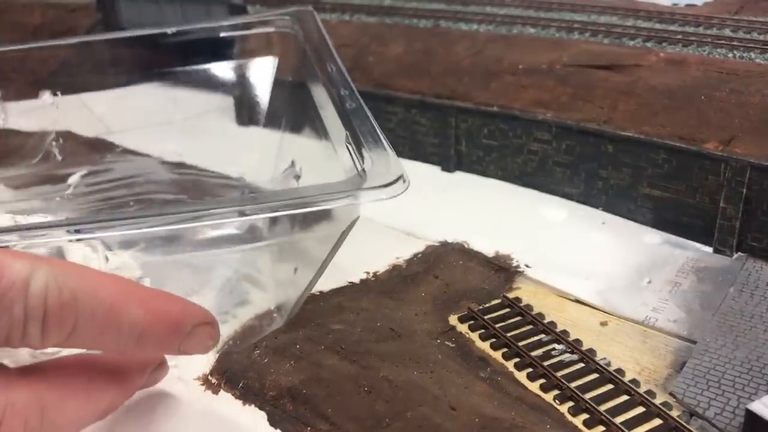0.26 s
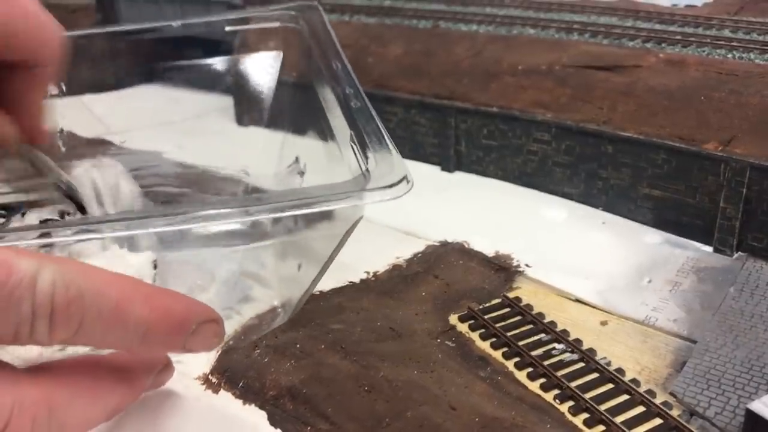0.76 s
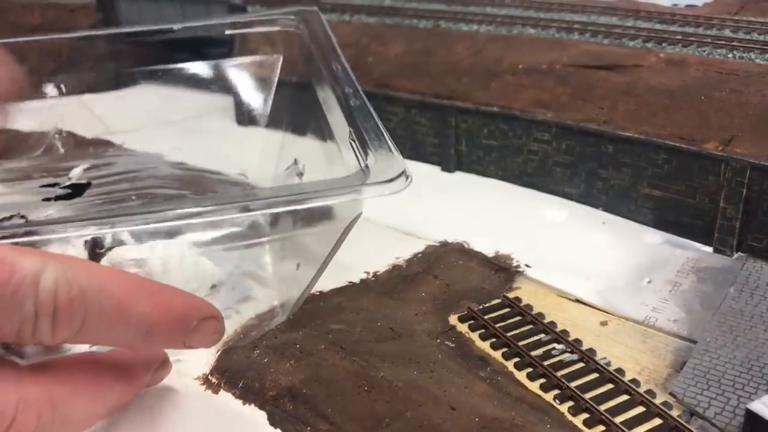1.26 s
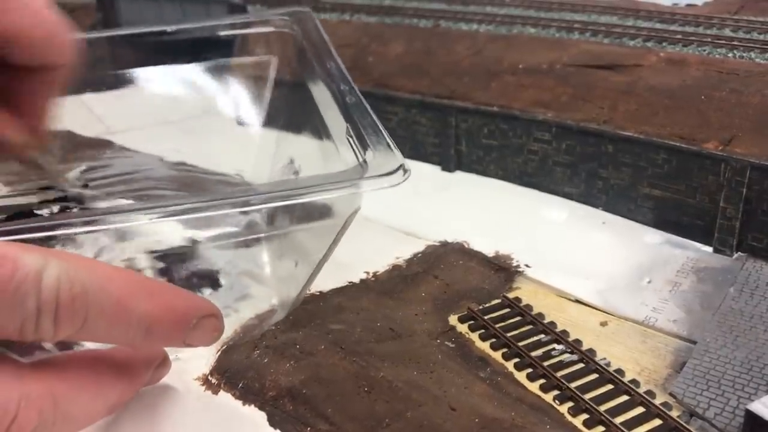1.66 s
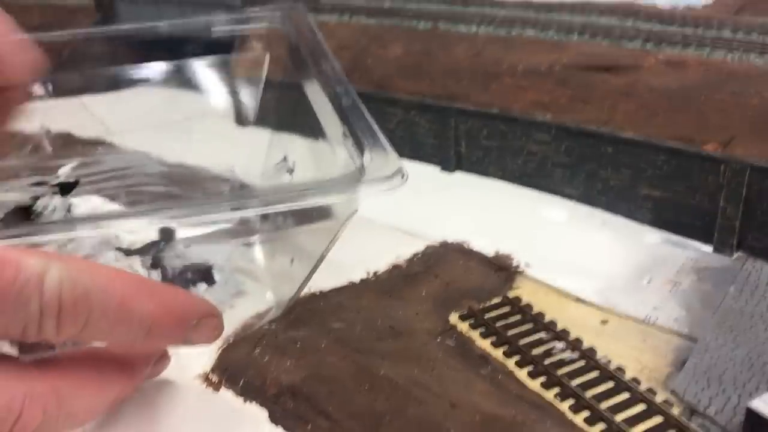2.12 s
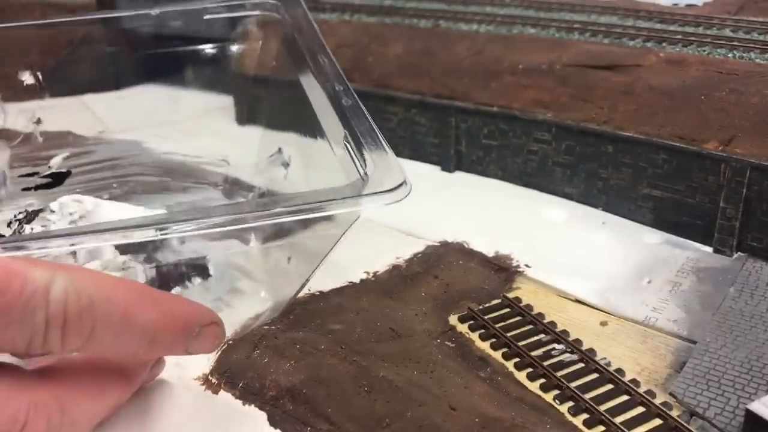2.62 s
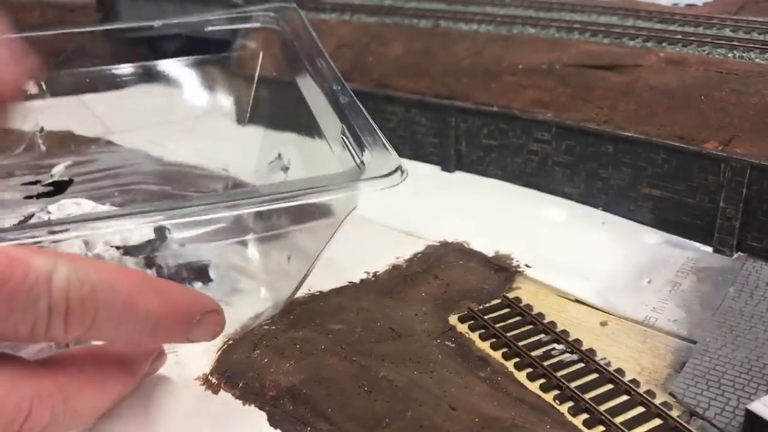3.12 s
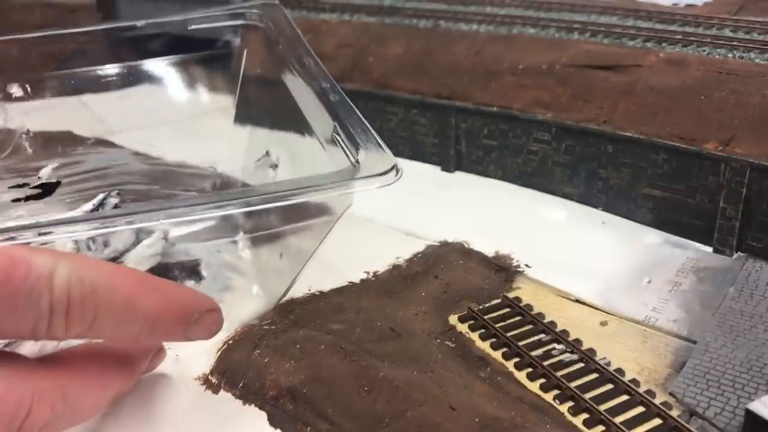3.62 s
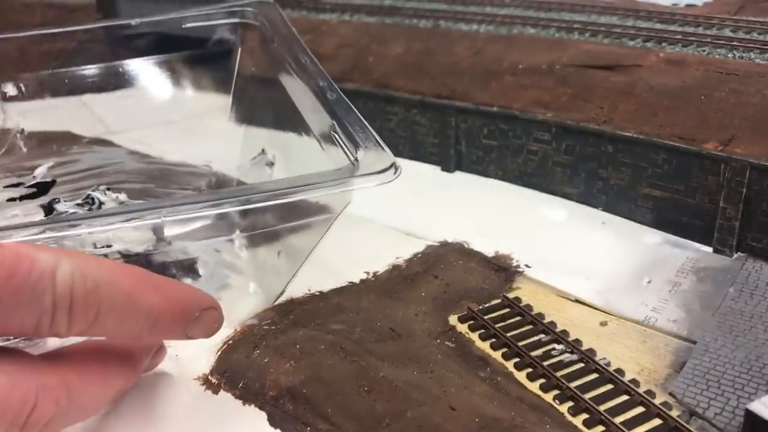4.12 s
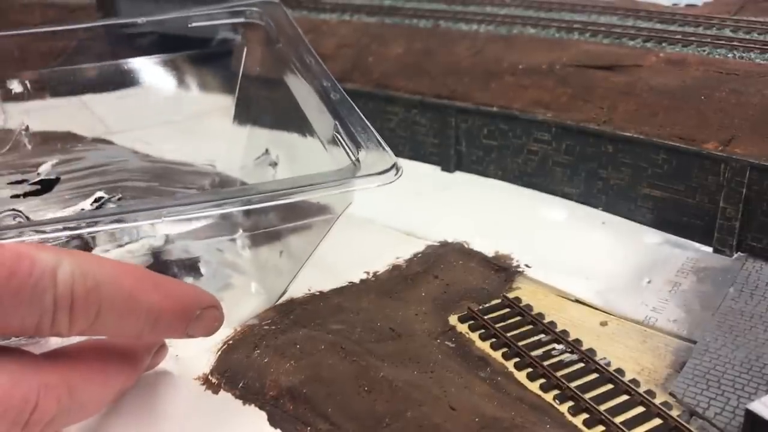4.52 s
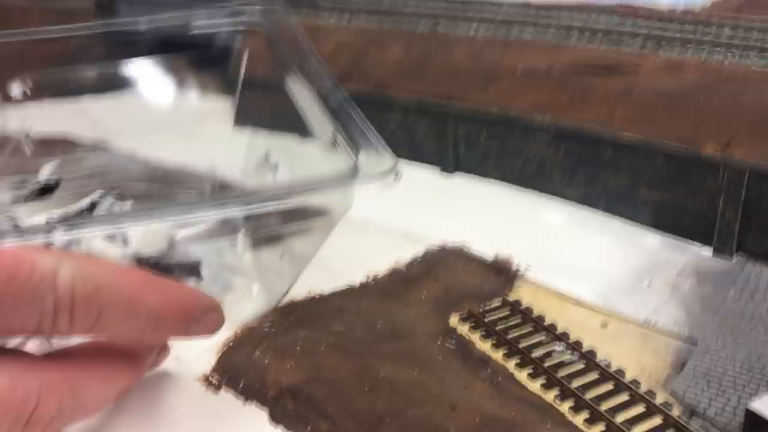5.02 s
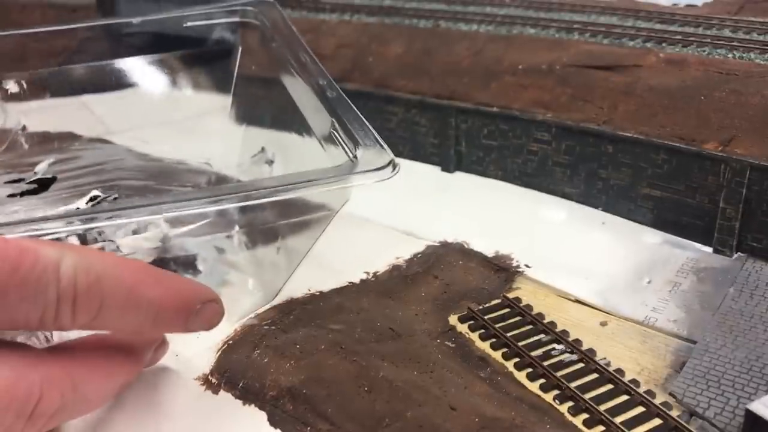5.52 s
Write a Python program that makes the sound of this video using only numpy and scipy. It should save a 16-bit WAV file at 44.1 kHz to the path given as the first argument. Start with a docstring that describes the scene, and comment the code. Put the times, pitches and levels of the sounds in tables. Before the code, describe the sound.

Irregular scraping and clicking come from a thin plastic container as a stick works sticky glue around inside it. Dull thumps and knocks from the flexing walls carry into a hollow table, the hardest ones slightly overloading the close microphone. After about two seconds the mixing thins to scattered ticks, then resumes a second later and continues. The room is small, with a faint rumble and hiss.

```python
"""On a hollow table in a small room, a stick stirs thick glue in a thin plastic tub, close to the microphone.
The tip scrapes the gritty bottom in short strokes, knocks and ticks on the walls; the glue ticks as it
lets go. The tub flexes and thumps, the table top booms after each push, and the loudest blows overload
the recorder."""
import sys
import numpy as np
from scipy import signal
from scipy.fft import rfft, irfft
from scipy.io import wavfile

SR = 44100
rng = np.random.default_rng(int(sys.argv[2]) if len(sys.argv) > 2 else 0)


def master(y):
    """Save y as 16-bit WAV."""
    cut = np.clip(np.atleast_2d(y).T, -1, 1)
    pcm = np.round(cut * 32767)  # scale
    wavfile.write(sys.argv[1], SR, pcm.astype(np.int16))


N = 254456


def from_db(db):
    """Gain of a level in dB."""
    return 10 ** (np.asarray(db) / 20)


def unit_rms(x):
    """Scale to rms 1."""
    return x / np.sqrt(np.mean(x ** 2) + 1e-20)


def butterworth(x, order, hz, kind="low"):
    """Low- or high-pass filter."""
    return signal.sosfilt(signal.butter(order, hz, kind, fs=SR, output="sos"), x)


def coloured(x, spectrum):
    """Filter by (frequency [Hz], gain [dB]) points."""
    hz, gain_db = np.transpose(spectrum)
    bins_hz = np.maximum(np.fft.rfftfreq(N, 1 / SR), 1)
    return irfft(rfft(x) * from_db(np.interp(np.log(bins_hz), np.log(hz), gain_db)), N)


def drift(rate_hz):
    """Smooth random wander, rms 1."""
    r = np.exp(-2 * np.pi * rate_hz / SR)
    return unit_rms(signal.lfilter([1], [1, -2 * r, r * r], rng.standard_normal(N + SR))[SR:])


def ring(force, hz, t60_s):
    """One mode: a unit click starts a decaying unit sine."""
    r, w = from_db(-60 / (t60_s * SR)), 2 * np.pi * hz / SR
    return signal.lfilter([0, np.sin(w)], [1, -2 * r * np.cos(w), r * r], force + 1e-18)


def resonance(x, hz, width_hz):
    """Band-pass, peak gain 1."""
    r, w = np.exp(-np.pi * width_hz / SR), 2 * np.pi * hz / SR
    return signal.lfilter([(1 - r * r) / 2, 0, (r * r - 1) / 2], [1, -2 * r * np.cos(w), r * r], x)


def grains(per_s, spread_db):
    """Random clicks of uneven size and sign, rms 1."""
    sizes = from_db(spread_db * np.minimum(rng.exponential(1, N), 4)) * rng.choice([-1, 1], N)
    return unit_rms(sizes * (rng.random(N) < per_s / SR))


# Room tone spectrum: (frequency [Hz], relative density [dB])
TONE_SPECTRUM = [(15, -33), (25, 17), (48, 8), (242, -3), (575, -16), (1070, -13.5), (1740, -21),
                 (2990, -24), (5000, -28.5), (7500, -28), (10400, -31), (13600, -25.5), (16000, -23)]
def room_tone(level_db=-40):
    """Low rumble and faint hiss, wavering slightly."""
    gain = from_db(level_db + 0.4 * drift(4.7))
    return gain * unit_rms(coloured(rng.standard_normal(N), TONE_SPECTRUM))


def room_tail(x, t60_s=0.26, level_db=-19.5):
    """Short diffuse tail of a small room."""
    t = np.arange(SR // 2) / SR
    tail = rng.standard_normal(len(t)) * from_db(-60 * t / t60_s) * (t > .006)
    return from_db(level_db) * signal.fftconvolve(x, tail / np.linalg.norm(tail))[:N]


# Hand pushes on the tub: (time [s], wall level [dB], table level [dB])
HAND_PUSHES = [(0.021, -24, -48), (0.11, -28, -19.5), (0.264, -34, -29.5), (0.444, -28, -23),
               (0.661, -49, -25.5), (0.808, -23, -23), (1.013, -23.5, -23), (1.179, -36, -18.5),
               (1.383, -14.5, -20), (1.473, -35, -25), (1.655, -16.5, -30), (1.772, -28.5, -24),
               (1.905, -19, -18), (2.178, -25.5, -17), (2.63, -47, -54), (2.89, -39, -21),
               (3.33, -24.5, -20.5), (3.47, -26, -30), (3.757, -23, -40), (3.83, -30, -53),
               (4.043, -26, -30), (4.33, -49, -29), (4.433, -21.5, -22.5), (4.79, -52, -23),
               (4.881, -26, -40), (5.133, -20.5, -15.5), (5.395, -57, -33), (5.509, -24.5, -28.5),
               (5.635, -31.5, -35), (5.76, -17, -42)]
def push_gain(part, rise_db_per_s, fall_db_per_s):
    """Envelope of "wall" or "table": each push builds and dies away; the strongest counts."""
    time_s, wall_db, table_db = np.transpose(HAND_PUSHES)[:, :, None]
    peak_db = {"wall": wall_db, "table": table_db}[part]
    hop = 50
    since_s = np.arange(0, N + hop, hop) / SR - time_s
    level_db = peak_db - np.where(since_s < 0, -rise_db_per_s, fall_db_per_s) * since_s
    return from_db(np.repeat(level_db.max(axis=0), hop)[:N])


# Table top resonances: (frequency [Hz], width [Hz], relative level [dB])
TABLE_MODES = [(40.2, 25.4, 2.5), (57, 6.7, -3), (81, 59, -6)]
def table_boom():
    """Each push shakes the hollow top, which rings on in a few low resonances."""
    def top(force):
        return sum(from_db(db) * resonance(resonance(force, hz, width_hz), hz, 2 * width_hz)
                   for hz, width_hz, db in TABLE_MODES)

    shake = rng.standard_normal(N)
    gain = push_gain("table", rise_db_per_s=900, fall_db_per_s=122)
    return top(gain * shake) / np.std(top(shake))


def glue_ticks(level_db=-66):
    """Glue lets go in faint, bright, scattered ticks."""
    envelope = signal.lfilter([1], [1, -.96], np.abs(grains(per_s=25, spread_db=3)))
    ticks = butterworth(envelope * rng.standard_normal(N), 1, 4000, "high")
    return from_db(level_db) * unit_rms(ticks)


# Tub modes: (frequency [Hz], relative level [dB], t60 before scaling [s])
TUB_MODES = [(126, -2.5, 0.33), (188.7, -3.5, 0.33), (239.5, 6.5, 0.11), (273.4, -0.5, 0.17),
             (325.6, 6.5, 0.081), (392, 1, 0.09), (437.5, -6.5, 0.23), (506, -1.5, 0.044),
             (635, 6.5, 0.067), (838, -4.5, 0.2), (934, 10.5, 0.049), (1035, -2.5, 0.12), (1298, 6, 0.086),
             (1414, 16.5, 0.013), (2110, 9, 0.042), (2770, 19.5, 0.0065), (3117, 7.5, 0.048),
             (3660, -13, 0.1), (4030, 15, 0.026), (5030, 26.5, 0.014), (5620, 10, 0.022), (7100, 3, 0.013),
             (7940, 0, 0.034), (11780, -16, 0.03), (12330, 16, 0.002), (14000, -7, .01)]
def wall_flex(t60_scale=0.27, tilt_db_per_octave=-2.6):
    """Thin walls creak under each push: small uneven slips drive the low modes."""
    slips = grains(per_s=200, spread_db=-1) * from_db(drift(5.8))
    walls = sum(ring(slips, hz, t60_scale * t60_s) * from_db(db + tilt_db_per_octave * np.log2(hz / 200))
                for hz, db, t60_s in TUB_MODES if hz < 1500)
    walls = butterworth(walls, 2, 900)   # soft finger contact
    return push_gain("wall", rise_db_per_s=578, fall_db_per_s=206) * unit_rms(walls)


# Tip strokes: (start [s], swell [s], fade [s], top level [dB], treble offset [dB])
TIP_STROKES = [ (0.045, 0.0017, 0.0081, -17, -11), (0.103, 0.014, 0.037, -13.5, -11.5),
               (0.183, 0.0069, 0.0092, -52, 4), (0.261, 0.0033, 0.0068, -37.5, -2),
               (0.387, 0.0096, 0.021, -40.5, 0.5), (0.428, 0.023, 0.031, -19, -10.5),
               (0.479, 0.003, 0.026, -28, -6.5), (0.575, 0.023, 0.075, -41, -8.5),
               (0.751, 0.032, 0.014, -26.5, -6), (0.801, 0.0028, 0.03, -22.5, -0.5),
               (0.892, 0.02, 0.016, -31.5, -1), (0.994, 0.042, 0.044, -28, -7.5),
               (1.075, 0.035, 0.022, -31, -2), (1.17, 0.016, 0.032, -21, -3.5),
               (1.335, 0.036, 0.1, -20, -1.5), (1.428, 0.048, 0.01, -18.5, 0),
               (1.486, 0.0046, 0.048, -35, -5), (1.593, 0.022, 0.039, -24.5, -5),
               (1.645, 0.017, 0.075, -18, -1), (1.721, 0.057, 0.024, -23, -3),
               (1.875, 0.033, 0.018, -21.5, -6), (1.927, 0.024, 0.067, -19, -0.5),
               (2.148, 0.013, 0.015, -31, -3.5), (2.168, 0.017, 0.016, -18, -10.5),
               (2.314, 0.029, 0.026, -34, -6), (2.527, 0.024, 0.032, -38, -10),
               (2.655, 0.033, 0.016, -41, -11), (2.84, 0.013, .015, -51, 1),
               (2.88, 0.0023, 0.017, -30, -17), (2.904, 0.013, 0.0065, -20, -2.5),
               (3.233, 0.0023, 0.025, -38, -7.5), (3.309, 0.038, 0.012, -30.5, -2.5),
               (3.449, 0.029, 0.027, -19, -7.5), (3.568, 0.052, 0.019, -22, -1),
               (3.716, 0.062, 0.077, -28.5, -3), (3.805, 0.027, 0.055, -22.5, 2.5),
               (3.872, 0.037, 0.038, -22.5, -2.5), (3.95, 0.0048, 0.016, -32.5, -3),
               (3.985, 0.039, 0.0087, -31.5, -4.5), (4.032, 0.015, 0.034, -18, -8),
               (4.216, 0.0032, 0.018, -39, -12), (4.461, 0.025, 0.068, -27, -0.5),
               (4.777, 0.026, 0.015, -22, -4.5), (4.857, 0.028, 0.049, -23, 1.5),
               (4.924, 0.032, 0.038, -24, -5.5), (5.012, 0.028, 0.07, -31.5, -0.5),
               (5.07, 0.027, 0.024, -29.5, -8), (5.114, 0.018, 0.073, -22, -5),
               (5.197, 0.077, 0.026, -33, 0.5), (5.445, 0.0026, 0.025, -50, 4),
               (5.5, 0.013, 0.015, -45, -2), (5.545, 0.017, 0.028, -31.5, -4),
               (5.607, 0.034, 0.015, -30, -3), (5.691, 0.0038, 0.11, -42.5, -2),
               (5.742, 0.021, .01, -31.5, -4.5), ]
def stroke_gains(swell_db=13.5, fade_db=14.5, cling_step_db=9, cling_db_per_s=389, treble_share=0.58):
    """Low and treble envelopes: abrupt contact, swell, fade, then a fast fall as the glue clings."""
    low, treble = np.zeros(N), np.zeros(N)
    for start_s, swell_s, fade_s, top_db, treble_db in TIP_STROKES:
        at, end_s = round(start_s * SR), swell_s + fade_s
        t = np.arange(min(round((end_s + .2) * SR), N - at)) / SR
        shape_db = np.interp(t, [0, swell_s, end_s], [-swell_db, 0, -fade_db])
        after_s = np.maximum(t - end_s, 0)
        cling_db = cling_step_db * np.minimum(after_s / 0.0028, 1) + cling_db_per_s * after_s
        gain = np.minimum(t / 0.0013, 1) * from_db(top_db - cling_db)
        low[at:at + len(t)] += gain * from_db(shape_db)
        treble[at:at + len(t)] += gain * from_db(treble_db + treble_share * shape_db)
    return low, treble


# Scrape colour: (frequency [Hz], relative gain [dB])
SCRAPE_SPECTRUM = [(290, 10), (500, 6.5), (668, -2), (773, -3), (1090, 5), (1230, 5.5), (2130, 0),
                   (3060, 6.5), (4940, -6.5), (7100, -15), (7750, -18), (15100, -25), (16000, -27.5)]
def tip_scrape(split_hz=7000):
    """Dense slips on grit wake tub modes that come and go as the tip moves; glue threads snap."""
    slips = grains(per_s=10000, spread_db=2.5) * from_db(0.67 * drift(110))
    snap_envelope = signal.lfilter([1], [1, -.95], np.abs(grains(per_s=230, spread_db=1.5)))
    snaps = unit_rms(snap_envelope * rng.standard_normal(N))
    body = sum(resonance(slips * from_db(3.06 * drift(26.5)), hz, 0.21 * hz) * (-1) ** k
               for k, (hz, _, _) in enumerate(TUB_MODES) if hz > 600)
    grit = coloured(0.023 * unit_rms(slips) + 0.5 * snaps + unit_rms(body), SCRAPE_SPECTRUM)
    low = unit_rms(butterworth(grit, 3, split_hz))
    treble = unit_rms(butterworth(grit, 3, split_hz, "high"))
    low_gain, treble_gain = stroke_gains()
    return low_gain * low + treble_gain * treble


def blows(events, reach_octaves, t60_scale, chatter_gain, contact_cycles, spot_gain, spot_t60_cycles,
          crack_gains=None, grip_detune=0.039):
    """A tap plus chatter rings the tub modes near its pitch; the struck spot rings too, and may crack."""
    out, t = np.zeros(N + 9000), np.arange(6000) / SR
    contact_t = t[:2000]
    hz, mode_db, t60_s = np.transpose(TUB_MODES)
    modes = np.sin(2 * np.pi * np.outer(hz, t)) * from_db(-60 * t / (t60_scale * t60_s[:, None]))
    crack_envelope = np.exp(-contact_t / 0.0008) + 0.59 * np.exp(-contact_t / 0.0058)
    noises = rng.standard_normal((len(events), len(contact_t)))
    scatters = rng.standard_normal((len(events), len(hz)))
    for k, (time_s, peak_db, centre_hz, contact_s) in enumerate(events):
        noise, scatter = noises[k], scatters[k]
        chatter = noise * np.exp(-(contact_t / contact_s) ** 3)
        force = chatter_gain * chatter / np.linalg.norm(chatter)
        force[0] += 1   # the tap
        softness = np.hanning(round(contact_cycles * SR / centre_hz) + 3)   # lower blow, softer contact
        force = np.convolve(force, softness)

        nearness = np.exp(-.5 * (np.log2(hz / centre_hz) / reach_octaves) ** 2)
        tub = (nearness * from_db(mode_db + 2 * scatter)) @ modes
        tub = np.interp(t * (1 + grip_detune * noise[-1]), t, tub)   # the grip shifts each blow's pitch
        blow = signal.fftconvolve(tub, force)
        blow /= np.abs(blow).max()

        free_cycles = np.maximum(t - contact_s, 0) * centre_hz   # the spot decays only once released
        spot_envelope = np.minimum(t * centre_hz, 1) * from_db(scatter[0] - 60 * free_cycles / spot_t60_cycles)
        blow[:len(t)] += spot_gain * spot_envelope * np.sin(2 * np.pi * centre_hz * t)
        if crack_gains is not None:
            blow[:len(noise)] += crack_gains[k] * np.diff(noise * crack_envelope, prepend=0)
        at = round(time_s * SR)
        out[at:at + len(blow)] += from_db(peak_db) * blow / np.abs(blow).max()
    return out[:N]


# Ticks: (time [s], peak [dB], centre [Hz], crack against ring [dB])
TIP_TICKS = [(0.0453, -8, 5070, -11), (0.114, -7.5, 3000, -30), (0.1217, -3, 3070, -31),
             (0.185, -19.5, 9000, -14), (0.191, -24, 8160, -14), (0.2437, -19.5, 3180, -4),
             (0.428, -13.5, 3360, -2), (0.447, -1, 2500, -33), (0.481, -14, 3100, -10),
             (0.651, -23, 3200, -14), (0.687, -25.5, 2990, -6), (0.7392, -24, 8200, -5),
             (0.7548, -6, 3760, -11.5), (0.8044, -11.5, 3230, -11), (0.8444, -30, 2370, -1),
             (0.8934, -6.5, 2990, 2), (1.031, -31, 2680, -17), (1.0652, -12, 9530, -20),
             (1.1695, -15, 3400, -12), (1.26, -26.5, 8700, -27), (1.4256, -11, 3000, 6),
             (1.6446, -5.5, 4740, -19), (1.7, -3, 2450, -24), (1.7707, -2, 2360, -37),
             (1.9007, 3, 3060, -31), (1.988, -10.5, 3370, -19), (2.0797, -24.5, 3500, -24),
             (2.1713, -13.5, 3020, -29), (2.2542, -18, 2520, -18), (2.359, -28, 3080, -14),
             (2.462, -35, 3440, -20), (2.597, -31, 2700, -25), (2.618, -29, 3300, -26),
             (2.881, -17, 3000, -10), (2.9099, -8, 2170, -6), (2.9853, -25, 12000, -2),
             (3.062, -38, 3330, -19), (3.095, -33, 11000, -5), (3.3226, -18.5, 3040, -14),
             (3.392, -28, 5970, -11), (3.437, -35, 3300, -18), (3.466, -10.5, 3150, -30),
             (3.554, -10.5, 2760, -11.5), (3.628, -7.5, 4250, -23), (3.7011, -8.5, 3880, -26.5),
             (3.8254, -4, 4060, -31), (3.9525, -16, 3400, -32), (3.9863, -18, 2840, -14),
             (4.042, -33, 3300, -23), (4.1854, -39, 2560, -10), (4.211, -32, 13100, -6),
             (4.251, -31, 2480, -8), (4.362, -36, 7260, -12), (4.3872, -19.5, 4300, -18),
             (4.659, -22, 2490, -12), (4.7807, -11.5, 2970, -18), (4.862, -18, 2640, -9),
             (5.068, -16, 2980, -14), (5.129, -14.5, 3530, -26), (5.343, -31, 3380, -24),
             (5.447, -24.5, 6840, -11), (5.46, -17.5, 2240, -18), (5.4995, -20, 2390, -20),
             (5.59, -21.5, 2750, -11), (5.61, -15, 2780, -7), (5.6413, -13, 2710, -4),
             (5.6956, -17, 3520, -20), (5.7165, -27, 3380, -18)]
def tip_ticks(min_contact_s=0.0009, linger_s=0.003):
    """The tip ticks and glue lets go with a dry crack; stronger ticks stay in contact longer."""
    events = [(time_s, peak_db, hz, min_contact_s + linger_s * from_db(peak_db))
              for time_s, peak_db, hz, _ in TIP_TICKS]
    crack_gains = [from_db(crack_db) for *_, crack_db in TIP_TICKS]
    return blows(events, reach_octaves=0.25, t60_scale=0.46, chatter_gain=1.1,
                 contact_cycles=0.38, spot_gain=0.2, spot_t60_cycles=12, crack_gains=crack_gains)


# Knocks: (time [s], peak [dB], centre [Hz], contact [s])
STICK_KNOCKS = [(0.014, -23.5, 840, 0.0038), (0.042, -15.5, 630, 0.0074), (0.114, -1.5, 458, 0.0049),
                (0.446, -0.5, 446, 0.0044), (0.58, -15.5, 602, 0.0019), (0.633, -22, 730, 0.0043),
                (0.657, -22, 770, 0.0028), (0.802, -15.5, 1135, 0.0037), (0.975, -18, 800, 0.0011),
                (1.173, -13.5, 1000, 0.0013), (1.437, -18, 960, 0.0018), (1.77, -3, 1350, 0.0068),
                (1.899, -17, 470, 0.0082), (2.172, -10, 570, 0.0068), (2.884, -15, 895, 0.0012),
                (2.927, -19, 680, 0.0017), (3.314, -17.5, 885, 0.0049), (3.453, -26, 625, 0.0049),
                (3.876, -18, 950, 0.0047), (4.039, -7, 685, 0.00061), (4.133, -27.5, 720, 0.005),
                (4.325, -16, 777, 0.0036), (4.406, -21.5, 910, 0.0027), (4.454, -10.5, 900, 0.0029),
                (4.455, -14.5, 1640, 0.0024), (4.553, -34, 1290, 0.0034), (4.654, -14, 1150, 0.0021),
                (4.834, -16, 580, 0.0014), (4.879, -15, 1460, 0.0023), (4.918, -19, 720, 0.003),
                (5.043, -15, 824, 0.0042), (5.131, -14, 1330, 0.0034), (5.234, -22, 816, 0.0014),
                (5.342, -31.5, 1190, 0.0022), (5.396, -7.5, 852, 0.0043), (5.499, -29, 855, 0.0036),
                (5.516, -22.5, 920, 0.0024), (5.675, -29, 990, 0.0027)]
def stick_knocks():
    """The stick hits the wall and rings a narrow group of middle modes."""
    return blows(STICK_KNOCKS, reach_octaves=0.35, t60_scale=0.59, chatter_gain=3.4,
                 contact_cycles=0.29, spot_gain=0.43, spot_t60_cycles=22)


# Thumps: (time [s], peak [dB], centre [Hz], contact [s])
WALL_THUMPS = [(0.017, -11.5, 183, 0.017), (0.108, 3, 239, 0.014), (0.125, 0, 230, 0.0053),
               (0.163, -10.5, 221, 0.0068), (0.26, -10.5, 177, 0.005), (0.4285, -10.5, 190, 0.0082),
               (0.445, 4, 270, 0.012), (0.654, -12.5, 224, 0.014), (0.728, -22, 199, .008),
               (0.753, -12.5, 197, 0.019), (0.803, -11, 250, 0.014), (0.873, -23, 118, 0.04),
               (0.971, -13, 216, 0.0087), (1.005, -22, 126, 0.015), (1.034, -14, 186, 0.022),
               (1.128, -24, 325, 0.0082), (1.177, -15, 227, 0.027), (1.364, -17, 250, 0.0061),
               (1.386, -9, 413, 0.0095), (1.401, -7, 263, 0.0093), (1.442, -12, 336, 0.0058),
               (1.646, -11, 190, 0.0075), (1.659, -5.5, 263, 0.0074), (1.895, -8, 198, 0.0046),
               (1.9, 3.5, 236, 0.009), (2.154, -22, 131, 0.0075), (2.179, -1, 225, 0.011),
               (2.185, -4, 408, 0.009), (2.256, -12.5, 166, 0.005), (2.624, -23.5, 102, 0.012),
               (2.881, -6.5, 120, 0.0068), (2.925, -15, 272, 0.0085), (3.239, -20.5, 116, 0.0053),
               (3.312, -10.5, 99, 0.022), (3.45, -7.5, 165, 0.011), (3.467, 0.5, 208, 0.013),
               (3.749, -22, 220, 0.0076), (3.775, -8.5, 200, 0.0063), (3.835, -11, 240, 0.016),
               (3.878, -18, 234, 0.019), (4.009, -25, 220, .006), (4.024, -15, 202, 0.0065),
               (4.039, 0.5, 209.5, 0.018), (4.07, -10, 194, 0.01), (4.045, -3.5, 456, 0.013),
               (4.136, -19, 220, 0.0086), (4.322, -6.5, 289, 0.0094), (4.403, -11.5, 141, 0.02),
               (4.429, -10, 97, 0.02), (4.579, -21.5, 283, 0.0085), (4.609, -23, 314, 0.0075),
               (4.656, -15.5, 350, 0.0076), (4.783, -12, 241, 0.011), (4.832, -14, 283, 0.0093),
               (4.88, -12, 273, 0.01), (5.043, -12.5, 263, 0.0092), (5.103, -13, 268, 0.013),
               (5.125, -0.5, 210, 0.014), (5.148, -11.5, 115, 0.015), (5.235, -18, 279, 0.01),
               (5.3935, -4, 334, 0.0061), (5.497, -14, 280, 0.0081), (5.519, -15.5, 302, 0.0064),
               (5.667, -21, 211, 0.016)]
def wall_thumps():
    """Pushed walls thump dully across a broad group of low modes."""
    return blows(WALL_THUMPS, reach_octaves=1.0, t60_scale=0.57, chatter_gain=1.82,
                 contact_cycles=0.19, spot_gain=0.44, spot_t60_cycles=4.6)


def scene():
    """Tub, room and table, in mono."""
    tub = wall_thumps() + stick_knocks() + tip_ticks() + tip_scrape() + wall_flex() + glue_ticks()
    return (room_tone() + room_tail(tub) + table_boom() + tub)[None]


# Microphone port dips: (frequency [Hz], width [Hz], gain [dB])
PORT_DIPS = [(4900, 400, -2.5), (7700, 600, -6), (10400, 700, -8)]
def record(dry):
    """Microphone bass cut and port dips, hard overload at full scale, steep top cut."""
    bass_cut_hz, top_cut_hz = 34, 15750
    x = butterworth(dry, 6, bass_cut_hz, "high")
    for hz, width_hz, dip_db in PORT_DIPS:
        x = x - (1 - from_db(dip_db)) * resonance(x, hz, width_hz)
    x = np.clip(x, -1, 1)
    return signal.sosfilt(signal.ellip(14, .1, 65, top_cut_hz, fs=SR, output="sos"), x)


dry = scene()
out = record(dry)
master(out)
```